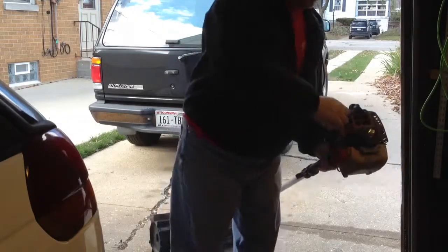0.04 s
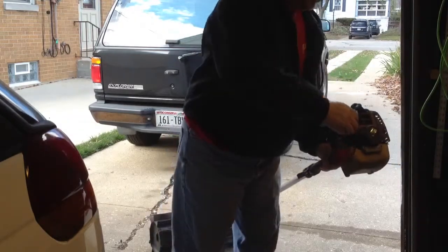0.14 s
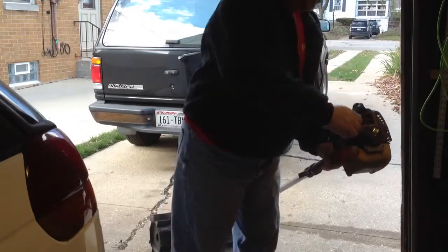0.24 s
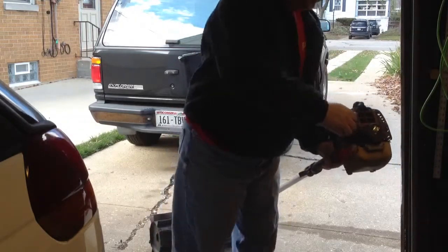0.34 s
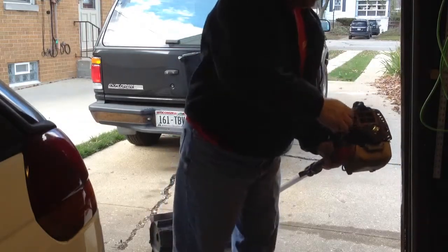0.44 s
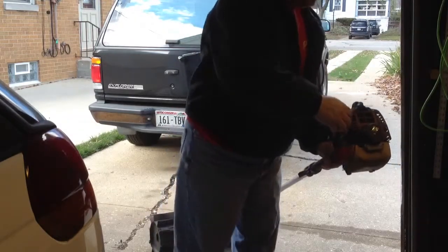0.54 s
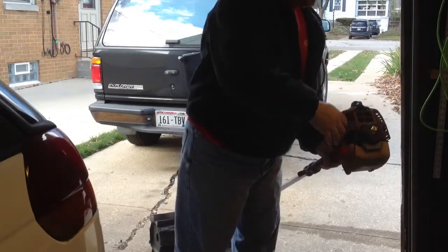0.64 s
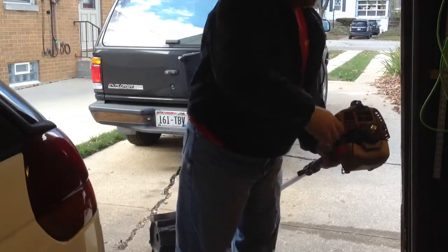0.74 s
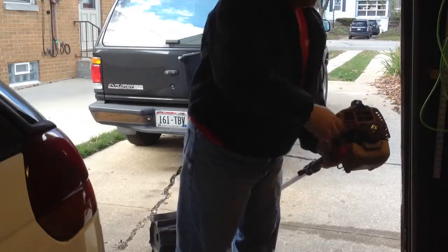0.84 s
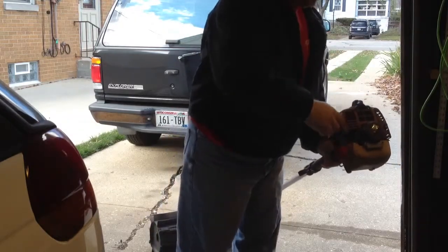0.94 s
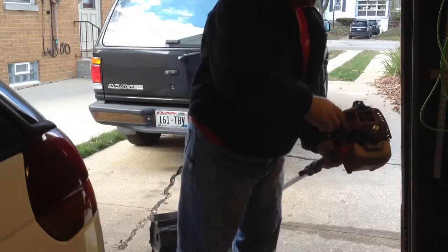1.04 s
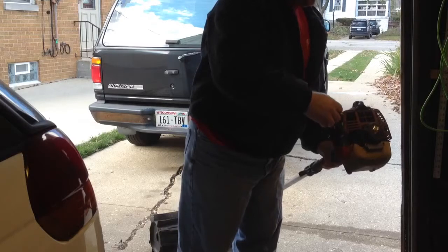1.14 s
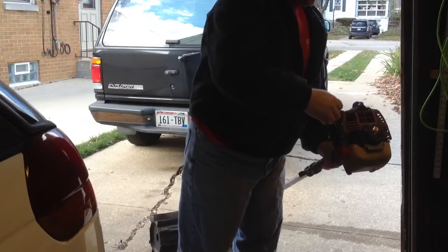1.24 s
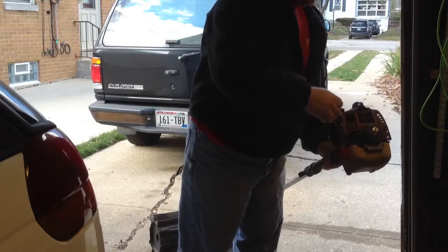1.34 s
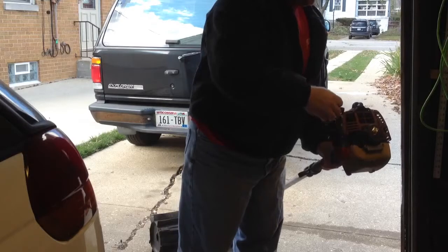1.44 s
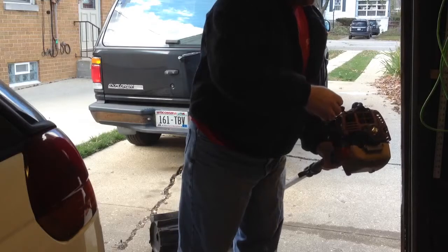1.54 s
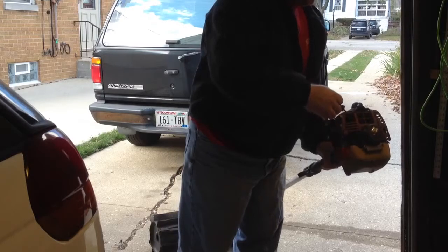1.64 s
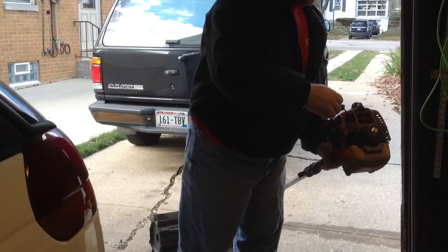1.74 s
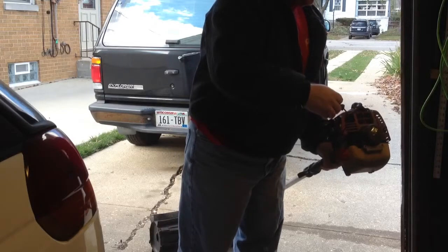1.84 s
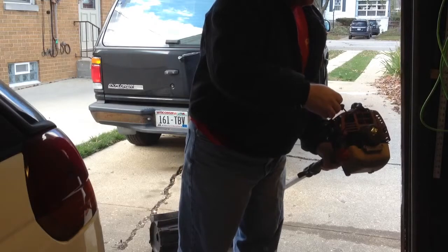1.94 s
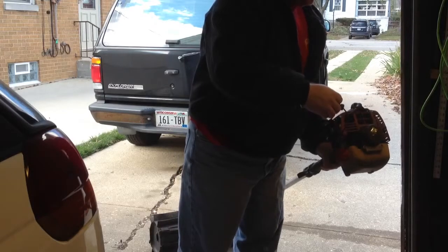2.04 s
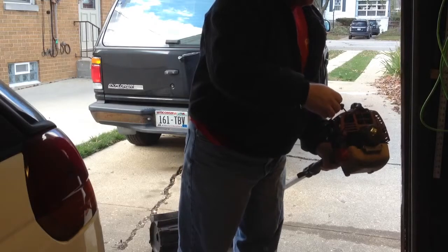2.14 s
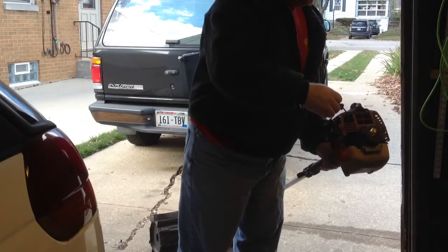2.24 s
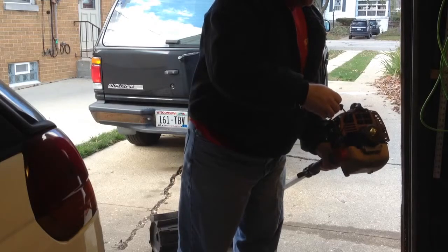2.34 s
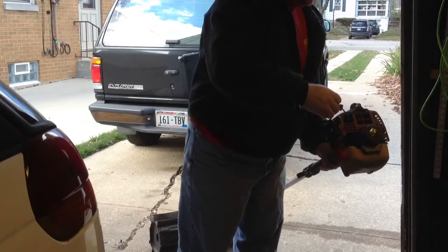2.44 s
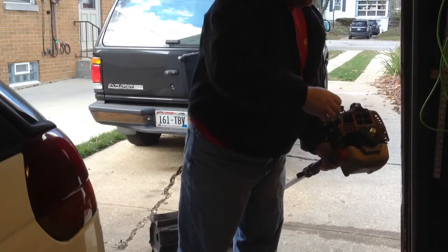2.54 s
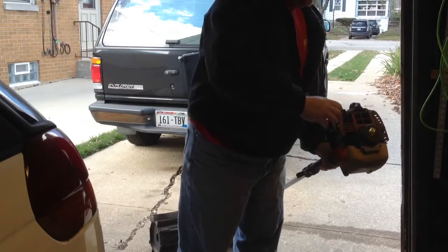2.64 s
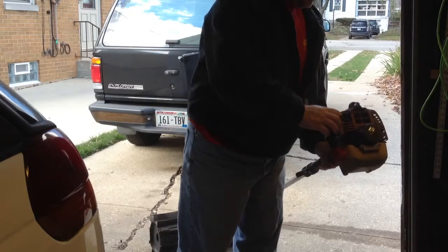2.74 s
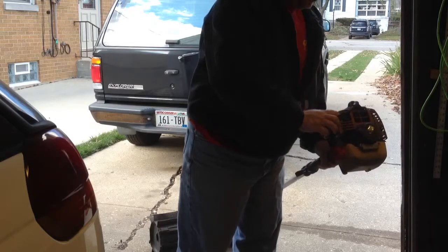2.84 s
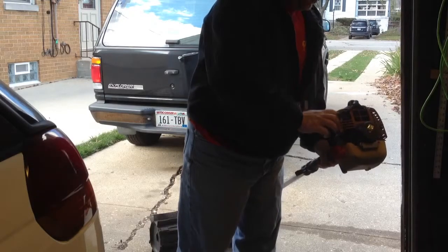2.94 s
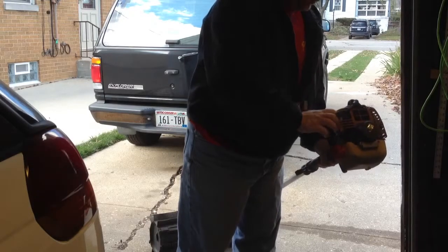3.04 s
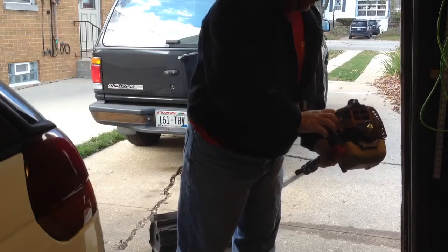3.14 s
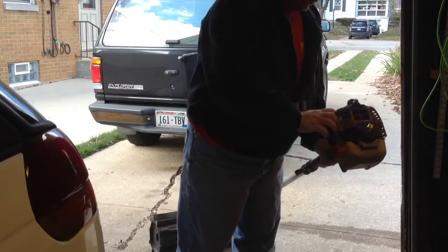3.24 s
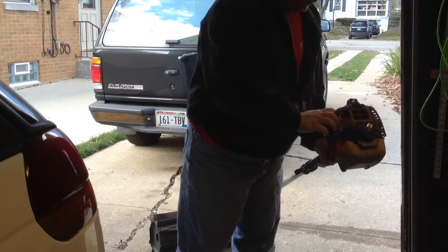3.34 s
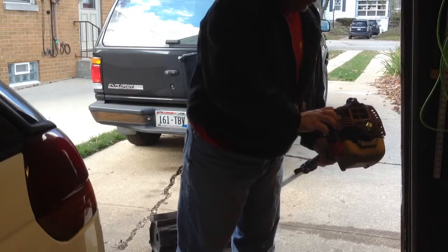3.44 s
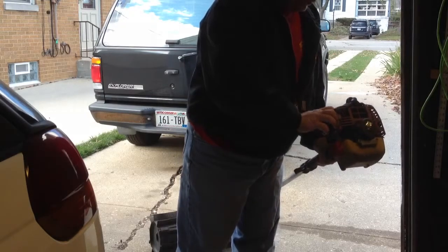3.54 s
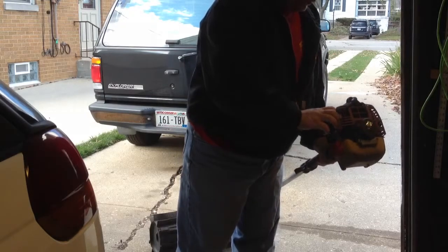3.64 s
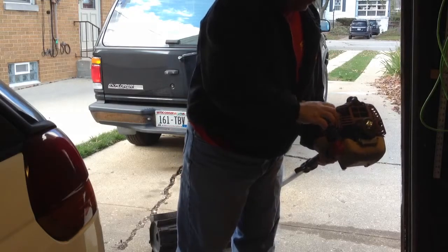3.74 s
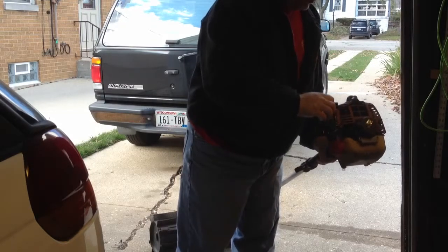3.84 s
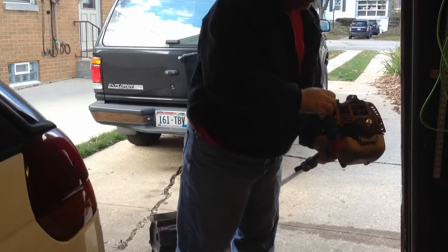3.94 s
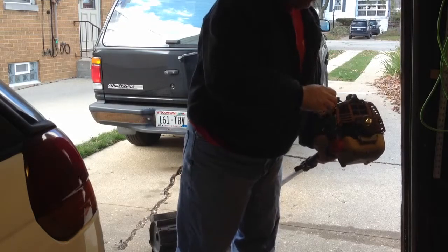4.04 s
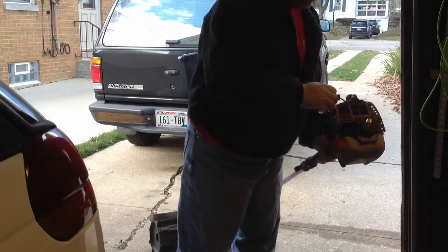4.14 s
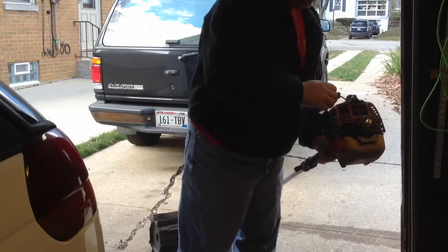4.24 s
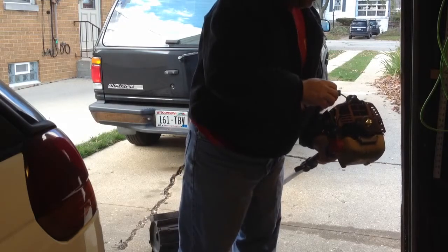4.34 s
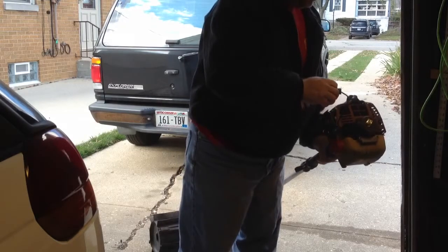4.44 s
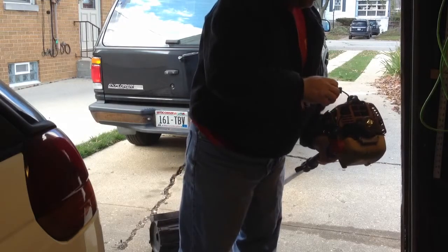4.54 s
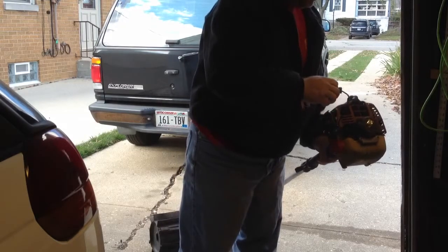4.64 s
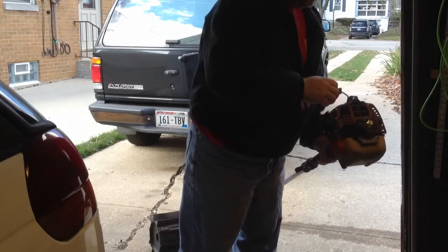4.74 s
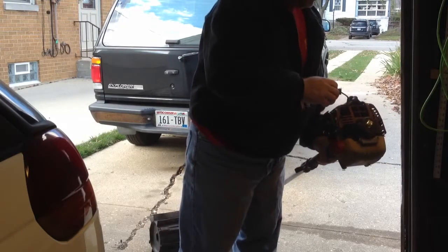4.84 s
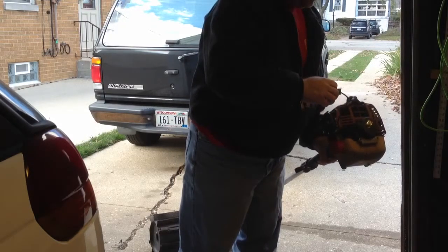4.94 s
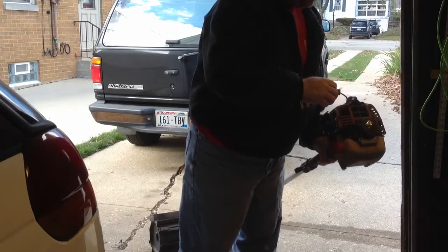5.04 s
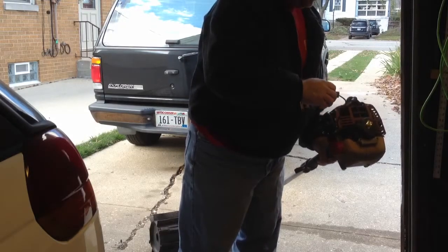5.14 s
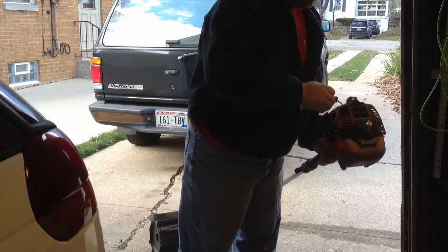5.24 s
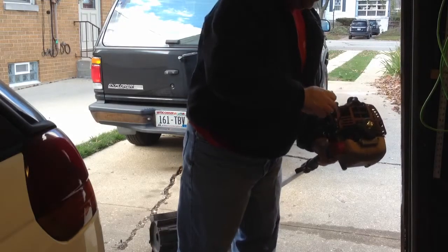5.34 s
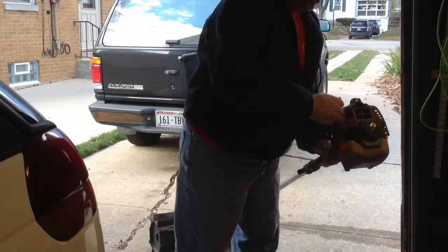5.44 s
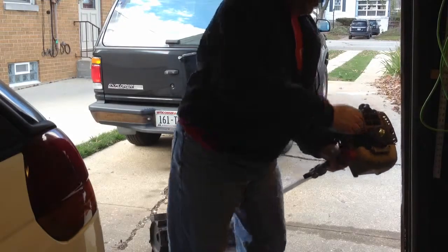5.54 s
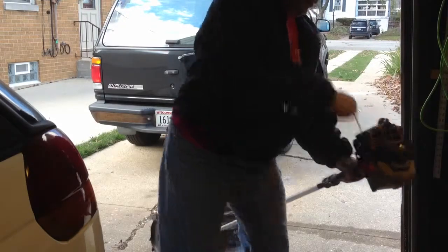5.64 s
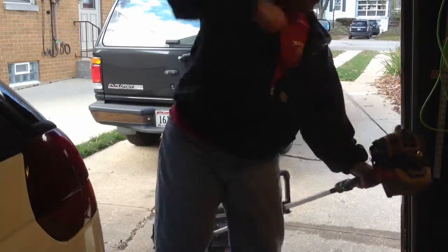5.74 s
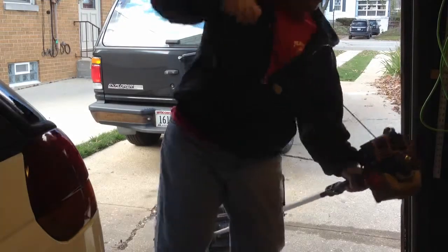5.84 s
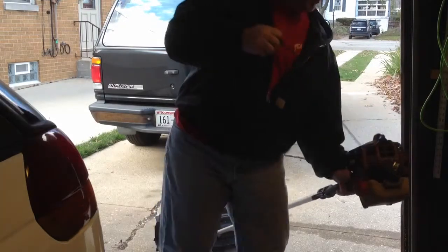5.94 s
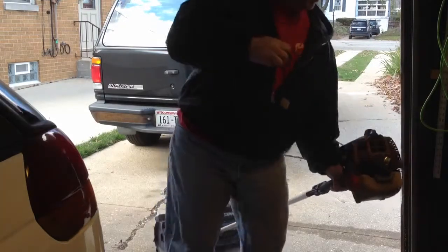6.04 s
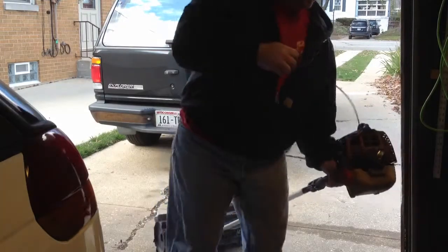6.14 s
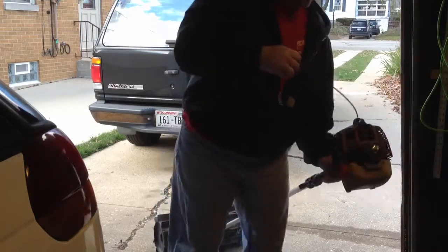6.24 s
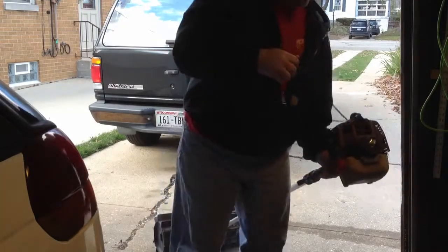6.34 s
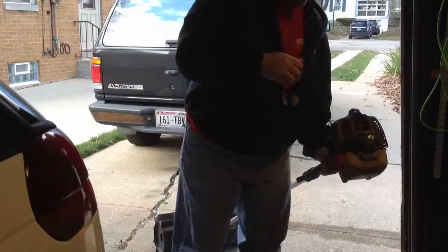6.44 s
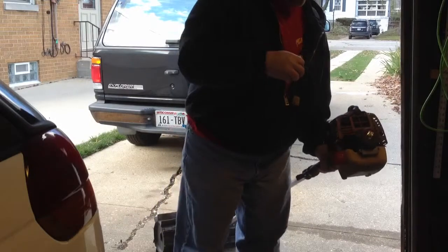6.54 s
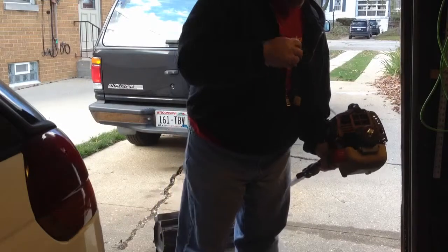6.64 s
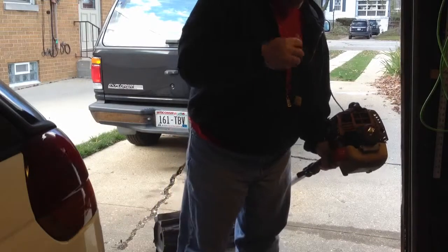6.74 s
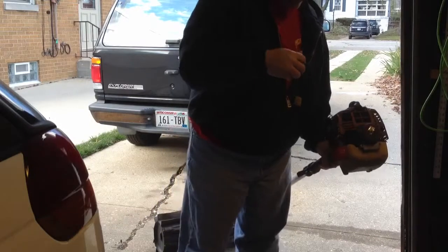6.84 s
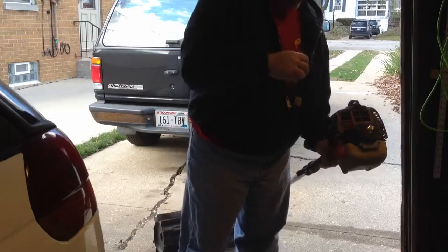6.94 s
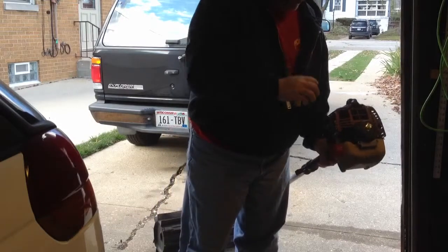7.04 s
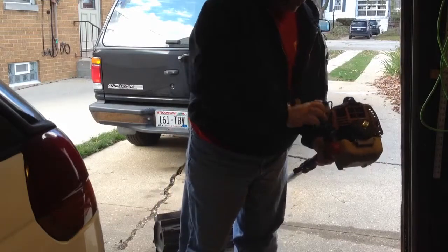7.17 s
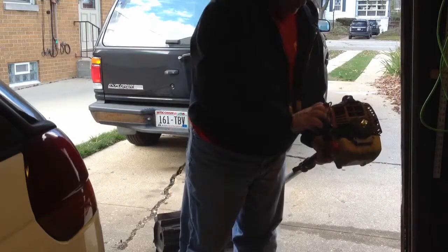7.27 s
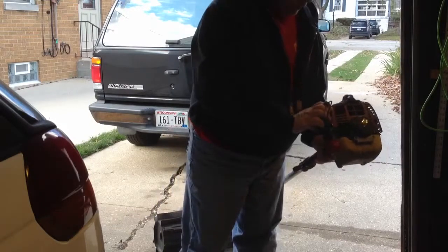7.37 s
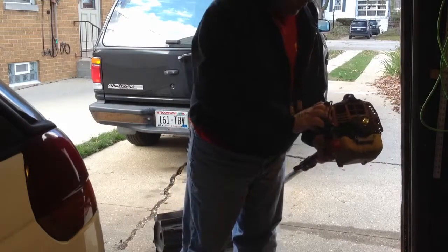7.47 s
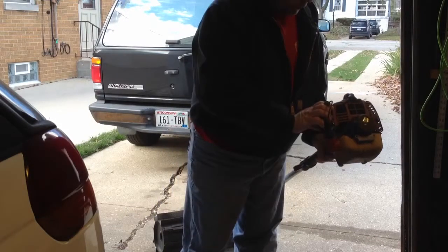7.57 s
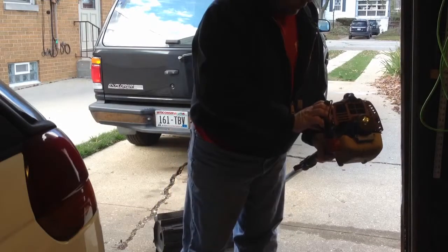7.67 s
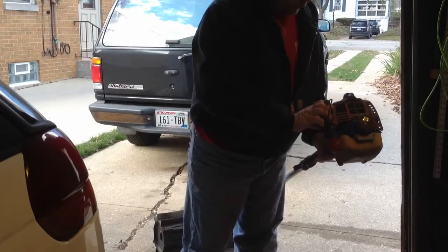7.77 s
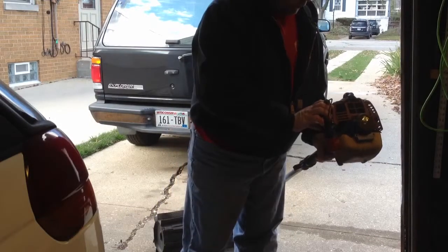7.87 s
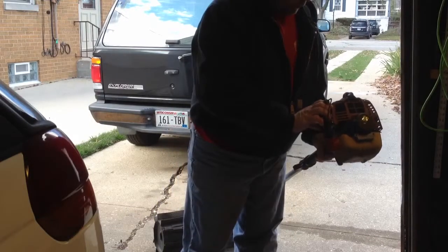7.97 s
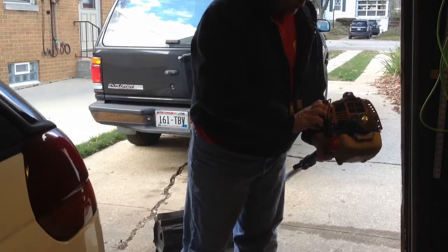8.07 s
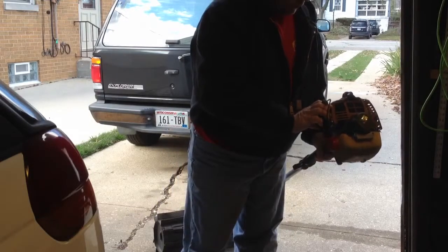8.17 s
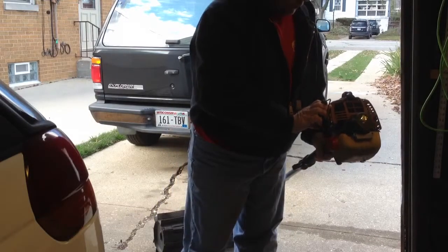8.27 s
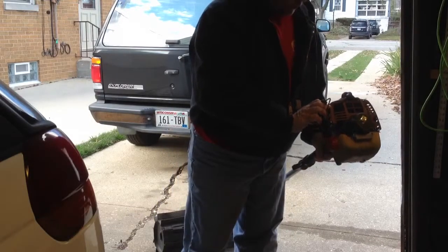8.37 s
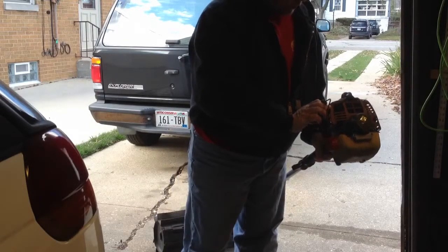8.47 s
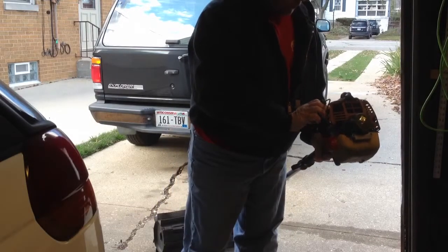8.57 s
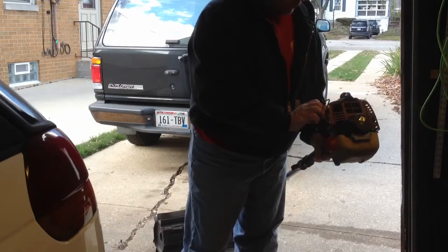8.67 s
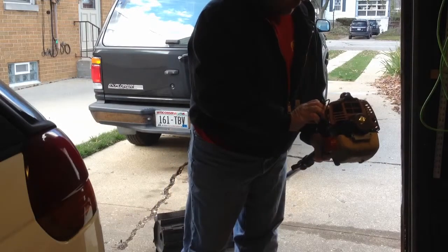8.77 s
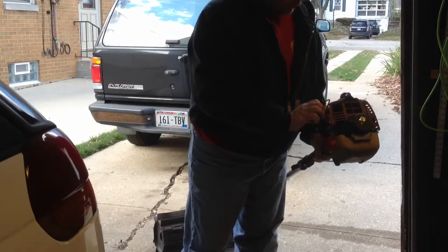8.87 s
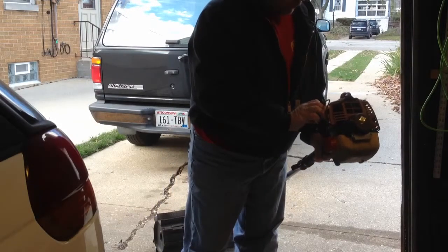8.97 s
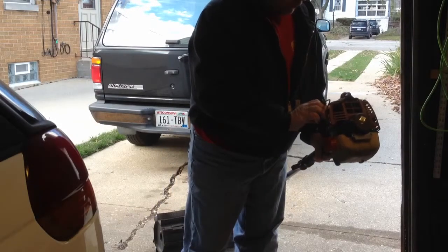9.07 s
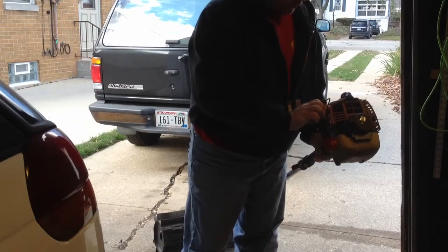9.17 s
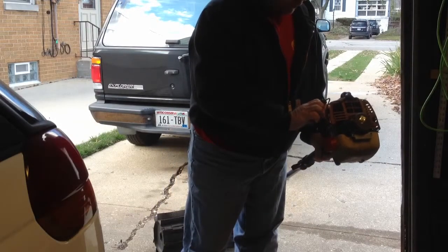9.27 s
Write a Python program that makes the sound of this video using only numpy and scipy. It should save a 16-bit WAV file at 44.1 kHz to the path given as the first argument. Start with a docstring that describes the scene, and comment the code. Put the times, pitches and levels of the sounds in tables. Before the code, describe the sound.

Quiet garage doorway with low distant traffic and steady hiss. Small plastic clicks and faint cloth rub as a hand fiddles with a trimmer engine. Past the middle, one sudden loud cord pull: bang, dense rattle, quick low puffs slowing to nothing in half a second, short garage echo. A thin high metal ring lingers under a few soft handling knocks. Microphone nearby, slightly hissy.

```python
"""In a garage doorway a hand fiddles with a small two-stroke trimmer, then yanks the recoil starter once.
Pawls bang in and parts rattle: grains of contact noise ring the resonances of the plastic housing.
The engine chuffs a few turns and dies, each puff a short push of air through muffler resonances.
A steel part rings on as beating sine pairs, and the clatter and puffs echo off sparse random taps.
Behind lie shaped noises: street rumble, a low hum, jacket rustle and microphone hiss with faint whines."""
import sys
import numpy as np
from scipy import signal
from scipy.fft import rfft, irfft
from scipy.io import wavfile
from scipy.ndimage import uniform_filter1d

SR = 44100
rng = np.random.default_rng(int(sys.argv[2]) if len(sys.argv) > 2 else 0)


def output_pcm(signal):
    """Save a mono or channel-first signal as 16-bit PCM at the path in sys.argv[1].

    Samples are clipped to [-1, 1] before scaling.
    """
    pcm = np.clip(np.atleast_2d(signal).T, -1, 1) * 32767
    wavfile.write(sys.argv[1], SR, np.round(pcm).astype(np.int16))


N = 410569

# resonances of the plastic housing, rung by blows and rattle: mode_hz, width_hz, level_db
HOUSING_MODES = [(608, 50, 8), (1130, 70, -7.5), (1308, 120, 0), (1522, 96, -9), (2000, 120, -11),
                 (2414, 120, -4), (2862, 90, 4), (2900, 90, -20), (3296, 180, -5.5), (3630, 110, 0.5),
                 (4850, 70, 1), (5750, 150, -1), (6210, 120, 0.5), (6730, 160, 0), (7450, 320, -2.5),
                 (8200, 160, 3.5), (9130, 150, -0.5), (9950, 150, -5.5), (11326, 170, 2.5),
                 (12200, 170, -6.5), (13500, 79, -10.5), (14400, 250, -6)]


def amp(db):
    """Decibels to linear gain."""
    return 10 ** (np.asarray(db) / 20)


def evened(x):
    """Scale a sound to an RMS of one."""
    return x / np.sqrt(np.mean(x ** 2) + 1e-20)


def read(points, hz):
    """Read a curve over frequency, straight between its points on a log pitch axis."""
    f, value = np.transpose(points)
    return np.interp(np.log(hz + 1), np.log(f + 1), value)


def curve(rows, column=1):
    """Draw one column of a time table as a line over the whole scene."""
    rows = np.asarray(rows)
    return np.interp(np.arange(N) / SR, rows[:, 0], rows[:, column])


def add(mix, start_s, sound):
    """Lay a sound into the mix, cut off at the end of the scene."""
    part = mix[round(start_s * SR):][:len(sound)]
    part += sound[:len(part)]


def modes(table, hz):
    """Complex response of a set of damped resonances."""
    return sum(amp(db) * .5 * width / (.5 * width + 1j * (hz - f)) for f, width, db in table)


def noise(tone, patchy_db, size=1024):
    """Coloured noise from random short-time spectra with drifting louder and softer patches."""
    hz = np.fft.rfftfreq(size, 1 / SR)
    real, imaginary, patches = rng.standard_normal((N * 4 // size + 5, len(hz), 3)).T
    patches = uniform_filter1d(patches, size=12, axis=0)  # smooth over frequency
    patches = evened(uniform_filter1d(patches, size=14, axis=1))  # and over time
    spectra = (real + 1j * imaginary) * amp(read(tone, hz)[:, None] + patchy_db * patches)
    return evened(signal.istft(spectra, nperseg=size, noverlap=size * 3 // 4)[1][:N])


def grit(shape, per_s, spread_db):
    """Sparse clicks of random sign; a few are large."""
    size = amp(spread_db * np.minimum(rng.exponential(1, shape), 4))
    present = rng.random(shape) < per_s / SR
    return size * rng.standard_normal(shape) * present


def street():
    """Distant traffic as noise whose deep and higher parts swell separately."""
    # swells of the traffic: time_s, deep_db (under 200 Hz), higher_db (over 200 Hz)
    traffic_swells = [(0, -76, -69.5), (.3, -66.5, -66), (.55, -69, -75.5), (.9, -75, -71.5),
                      (1.35, -68, -74), (2.2, -76.5, -75), (2.95, -75, -74), (3.25, -73, -59),
                      (3.6, -77, -66), (4.2, -74.5, -74.5), (5.05, -76, -65), (5.5, -70, -69.5),
                      (6.5, -74.5, -67.5), (7.2, -69.5, -70), (7.42, -74.5, -65.5), (7.7, -64.5, -61),
                      (8.28, -68.5, -69), (8.65, -65.5, -66), (9.31, -67.5, -70.5)]
    # colour of the traffic noise: pitch_hz, level_db (per Hz)
    traffic_tone = [(30, -29.5), (100, -4.5), (140, 2), (200, 3.5), (280, -3), (420, -16.5), (600, -28),
                    (900, -28), (2000, -59.5)]
    wash = noise(traffic_tone, 2.0, size=2048)
    deep = signal.sosfiltfilt(signal.butter(2, 200, fs=SR, output="sos"), wash)
    higher = wash - deep
    return amp(curve(traffic_swells)) * evened(deep) + amp(curve(traffic_swells, column=2)) * evened(higher)


def hum():
    """A low hum in the street noise: noise in one narrow resonance, swelling once."""
    start_s, length_s, level_db = 3.5, 0.9, -70
    pitch_hz, width_hz = 237, 36  # the resonance is applied twice
    resonance = modes([(pitch_hz, width_hz, 0)], np.fft.rfftfreq(N, 1 / SR)) ** 2
    band = evened(irfft(rfft(rng.standard_normal(N)) * resonance, N))
    progress = np.clip((np.arange(N) / SR - start_s) / length_s, 0, 1)
    return amp(level_db) * band * np.sin(np.pi * progress)


def jacket():
    """Cloth noise: a faint steady rub that swells and stops with each move of the arm."""
    # arm moves: start_s, swell_s, hold_s, level_db
    arm_moves = [(-.1, 0.29, 0.13, -67.5), (2.5, 0.39, 0.082, -75), (5.403, .26, .1, -56),
                 (6.895, 0.23, 0.28, -64)]
    # colour of rubbing cloth: pitch_hz, level_db (per Hz)
    cloth_tone = [(180, -24), (300, 2.5), (348, -7.5), (835, -6.5), (2140, -8), (2610, -9.5), (4350, -17),
                  (6460, -14.5), (13600, -20), (15500, -21)]
    still_db, stop_s = -78, 0.15
    t = np.arange(N) / SR
    level = amp(still_db)
    for start_s, swell_s, hold_s, db in arm_moves:
        corners_s = np.cumsum([0, swell_s, hold_s, stop_s])
        level = level + amp(db) * np.interp(t - start_s, corners_s, [0, 1, 1, 0]) ** 2
    return level * noise(cloth_tone, 0.95)


def garage():
    """Garage echo: sparse taps of random sign, each band dying at its own speed."""
    # echo decay by band: pitch_hz, t60_s
    decay_times = [(150, 0.55), (500, 0.16), (2000, 0.19), (6000, 0.22), (14000, 0.18)]
    taps = np.zeros(SR // 2)
    at = np.arange(100, len(taps) - 10, 10)
    taps[at + rng.integers(0, 10, len(at))] = rng.choice([-1., 1.], len(at))
    hz, t, spectra = signal.stft(taps, SR, nperseg=256)
    fade = amp(-60 * t / read(decay_times, hz)[:, None])
    tail = signal.istft(spectra * fade, SR, nperseg=256)[1]
    return tail / np.linalg.norm(tail)


def echoed(x, direct_db=-8, shift_s=.09):
    """Direct sound plus echo; three random tails fade into one another, so no fixed pitches stand out."""
    turn = np.arange(N) / SR / shift_s  # radians, so one radian lasts shift_s
    mix = amp(direct_db) * x
    for k in range(3):
        share = np.sqrt(2 / 3) * np.cos(turn + k * np.pi / 3)  # squares of the three shares sum to one
        mix = mix + signal.oaconvolve(x * share, garage())[:N]
    return mix


def steel(beat_hz=0.91, twin=0.33):
    """A steel part rings in long, clean partials; each has a close twin, so the ring slowly wavers."""
    # partials set ringing as the engine slows: pitch_hz, level_db, t60_s (before the grip), start_s
    partials = [(2109, -50.5, 4.4, 6.04), (3700, -52.5, .5, 6.121), (4310, -47, .2, 6.121),
                (4760, -45.5, 0.47, 6.121), (5700, -34, 0.26, 6.121)]
    grip_s, grip_db_per_s = 7.9, 13  # a knock of the hand damps the ring from here on
    out, t = np.zeros(N), np.arange(3 * SR) / SR
    for hz, db, t60, start_s in partials:
        pair = np.sin(2 * np.pi * hz * t) + twin * np.sin(2 * np.pi * (hz + beat_hz) * t)
        damping_db = grip_db_per_s * np.maximum(t + start_s - grip_s, 0)
        fade = amp(db - 60 * t / t60 - damping_db)
        rise = np.minimum(t / 0.01, 1)
        add(out, start_s, fade * pair * rise)
    return out


def rattle(broad=1.0):
    """Flywheel, pawls and cord: dense small contacts ring the housing while the engine turns."""
    # rattle before radiation: time_s, low_db (under 5 kHz), treble_db (over 5 kHz, against low_db)
    turning_levels = [(5.8, -49, 0.5), (5.848, -30.5, 3.5), (5.992, -44.5, 4), (6.002, -41, 13.5),
                      (6.11, -58.5, -8), (6.124, -47, 8.5), (6.244, -56, 4), (6.26, -63, -3),
                      (6.33, -70, -8)]
    hz = np.fft.rfftfreq(N, 1 / SR)
    thin = 1 / np.sqrt(1 + (500 / (hz + 1)) ** 4)  # little sounds under 500 Hz
    body = rfft(grit(N, 2500, 3.9)) * (broad + modes(HOUSING_MODES, hz)) * thin
    low = evened(irfft(body * (hz < 5000), N))
    high = evened(irfft(body * (hz >= 5000), N))
    t = np.arange(N) / SR
    turning = np.clip((t - turning_levels[0][0]) / 0.0071, 0, 1) * (t < turning_levels[-1][0])
    return amp(curve(turning_levels)) * (low + amp(curve(turning_levels, column=2)) * high) * turning


def knocks(broad=0.73, favour_db=9):
    """Each blow is a chatter of contacts, with a faint 14 ms rise before it; the spot picks its modes."""
    # blows on the housing, before radiation: start_s (of the blow), level_db,
    # body_db and treble_db (against the middle), low_hz, middle_hz, high_hz (favoured by the struck spot),
    # swell_db (around middle_hz), rise_db (against the blow's force)
    blows = [(0.848, -67, 5, 8.5, 615, 2980, 6900, 3, -20), (1.088, -73, 4, -2, 538, 3100, 5780, 3, -21),
             (1.407, -79.5, 1, 20, 501, 3190, 10900, 0.6, -21),
             (2.127, -45, -0.5, 14.5, 680, 3660, 7570, 7.8, -20),
             (2.918, -76.5, 12, -1.5, 713, 2500, 5510, 3, -19),
             (3.149, -73, 5, -6, 620, 1910, 6730, 5.8, -21), (3.399, -72, 0, -4, 610, 2350, 5950, 4, -12),
             (3.477, -65.5, 8, 4.5, 700, 2000, 9530, 3.7, -20),
             (3.546, -48.5, -4.5, 11.5, 636, 1810, 10870, 7.1, -40),
             (3.867, -63, 8, 10, 1300, 3600, 7540, 3, -19), (3.878, -56, 3, 5.5, 660, 2380, 7800, 5.5, -16),
             (4.919, -81, -4, 19, 716, 3690, 9740, 0.6, -20),
             (5.787, -24, 5, 11, 1150, 2390, 7060, 3.5, -27.5),
             (5.794, -22, -5, 5.5, 1300, 2380, 12500, 2.5, -24.5),
             (5.996, -34, -16, 2.5, 616, 3800, 6150, 1.3, -17),
             (6.121, -35, -15.5, 2.5, 1301, 4980, 6430, 2.4, -18),
             (6.259, -54.5, -4, -9.5, 1500, 2180, 7000, 7.3, -23),
             (6.839, -73, 3, -7, 1966, 2200, 6330, 7.4, -19),
             (6.929, -65.5, -5, 0.5, 2000, 2200, 6630, 3, -12),
             (7.39, -72.5, -4, 1, 1770, 3370, 6100, 9.7, -24.5),
             (7.422, -49.5, -2.5, 10, 1890, 2970, 7150, 2.7, -29),
             (8.015, -59.5, 8, 2, 1293, 2440, 7230, 4.5, -26.5),
             (8.438, -58.5, 10.5, 3, 605, 2440, 8360, 7, -23.5),
             (8.462, -56, 5.5, -2.3, 1220, 2400, 7320, 8.9, -15)]
    # colour shared by all blows: pitch_hz, level_db (per Hz)
    blow_tone = [(700, 6.5), (1400, 5.5), (2400, 2), (3500, -1.5), (5000, -3.5), (7300, -2), (10000, -3),
                 (13000, -5)]
    chatter_s, rise_s = 0.0026, .014  # chatter_s is a decay constant
    body_hz = (1390, 2400)  # where body gives way to middle
    treble_octaves = (-.65, -.3)  # treble sets in just under the high pitch
    thin_share, swell_octaves = .6, 0.35  # little sounds under this share of the low pitch
    out, size = np.zeros(N), 8192
    t, hz = np.arange(size) / SR - rise_s, np.fft.rfftfreq(size, 1 / SR)
    mode_hz, width_hz, mode_db = np.transpose(HOUSING_MODES)
    low = np.interp(hz, body_hz, [1, 0])
    for s, db, body_db, treble_db, low_hz, middle_hz, high_hz, swell_db, rise_db in blows:
        near = sum(np.exp(-(np.log(mode_hz / f) / 0.061) ** 2) for f in (low_hz, middle_hz, high_hz))
        struck = zip(mode_hz, width_hz, mode_db + favour_db * near)
        force = np.where(t < 0, amp(rise_db) * (1 + t / rise_s), np.exp(-t / chatter_s))
        chatter = rfft(grit(size, 9000, 3.5) * force)
        # contacts carry no colour of their own
        chatter /= np.sqrt(uniform_filter1d(abs(chatter) ** 2, size=41) + 1e-12)
        swell = np.exp(-(np.log2((hz + 1) / middle_hz) / swell_octaves) ** 2)
        high = np.interp(np.log2((hz + 1) / high_hz), treble_octaves, [0, 1])
        colour_db = read(blow_tone, hz) + body_db * low + treble_db * high + swell_db * swell
        body = amp(colour_db) * (broad + modes(struck, hz))
        thin = 1 / np.sqrt(1 + (thin_share * low_hz / (hz + 1)) ** 6)
        blow = irfft(chatter * body * thin)[:size // 2]
        add(out, s - rise_s, amp(db) * evened(blow))
    return out


def puffs():
    """Each compression pushes a slug of air through the resonant muffler."""
    # compression puffs, slowing down: start_s, peak_db (before the mix), push_hz
    compressions = [(5.794, -24, 403), (5.817, -33, 318), (5.838, -19, 350), (5.863, -20.5, 345),
                    (5.879, -21.5, 187), (5.892, -15.5, 381), (5.922, -22.5, 362), (5.956, -20, 342),
                    (5.989, -30, 303), (6.008, -21.5, 300), (6.07, -29, 310), (6.145, -36, 226),
                    (6.211, -47, 180), (6.287, -48.5, 222)]
    # resonances of the muffler: mode_hz, width_hz, level_db
    muffler_modes = [(131.2, 40, -6.5), (196, 35, 0.5), (223, 23, -4), (314, 44, -2.5), (397, 33, -7.5),
                     (613, 120, -12.5)]
    out, t = np.zeros(N), np.arange(4096) / SR
    muffler = 0.11 + modes(muffler_modes, np.fft.rfftfreq(len(t), 1 / SR))
    outlet = signal.butter(3, 135, "high", fs=SR, output="sos")  # a small opening radiates little bass
    for start_s, db, push_hz in compressions:
        push = np.sin(2 * np.pi * push_hz * t) * t * np.exp(-t / 0.0015)
        puff = signal.sosfilt(outlet, irfft(rfft(push) * muffler))
        add(out, start_s, amp(db) * puff / abs(puff).max())
    return out


def trimmer():
    """The whole tool: radiated clatter and engine puffs with their garage echo, and the steel ring."""
    # how much of the clatter reaches the door: pitch_hz, gain_db
    radiated = [(300, -7), (600, 3.5), (800, 3), (1200, 1), (3800, 6), (4300, 1), (5000, 5), (8400, 2),
                (9300, 2.5), (10500, 5), (15500, -1)]
    chuff = puffs()
    radiation = amp(read(radiated, np.fft.rfftfreq(N, 1 / SR)))
    clatter = irfft(rfft(knocks() + rattle()) * radiation, N)
    chuff_echo = signal.oaconvolve(chuff, garage())[:N]
    return echoed(clatter) + 0.73 * chuff_echo + 1.2 * chuff + steel()


def scene():
    """The trimmer over street, hum and jacket, as one channel."""
    return (trimmer() + street() + hum() + jacket())[None]


def record(dry):
    """A soft limit keeps the highest peaks in range; deep bass is dropped, hiss and whine added;
    then the band limit."""
    # colour of the hiss: pitch_hz, level_db (per Hz)
    hiss_tone = [(180, -22), (300, -5), (700, -5), (1500, -11), (2800, -12.5), (5000, -15.5), (8300, -17),
                 (8800, -21), (10200, -22.5), (10500, -18.5), (13700, -15.5), (15700, -20)]
    # faint steady whines: pitch_hz, level_db
    whine_tones = [(1561, -85.5), (10400, -90)]
    hiss_db, edge_hz = -68, 15600
    limited = dry / (1 + abs(dry / .8) ** 4) ** (1 / 4)
    thin = signal.sosfilt(signal.butter(3, 110, "high", fs=SR, output="sos"), limited)
    t = np.arange(N) / SR
    whine = sum(amp(db) * np.sin(2 * np.pi * hz * t) for hz, db in whine_tones)
    hissy = thin + amp(hiss_db) * noise(hiss_tone, 0.66) + whine
    band_limit = signal.firwin(511, edge_hz, window=("kaiser", 9), fs=SR)
    return signal.oaconvolve(hissy, band_limit[None], "same")


dry = scene()
out = record(dry)
output_pcm(out)
```